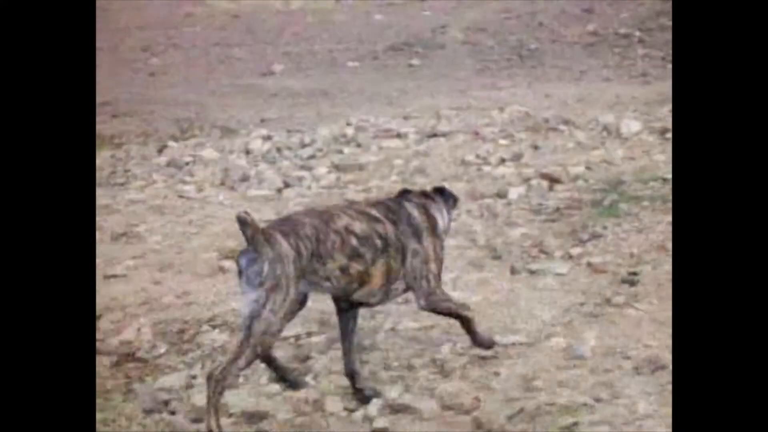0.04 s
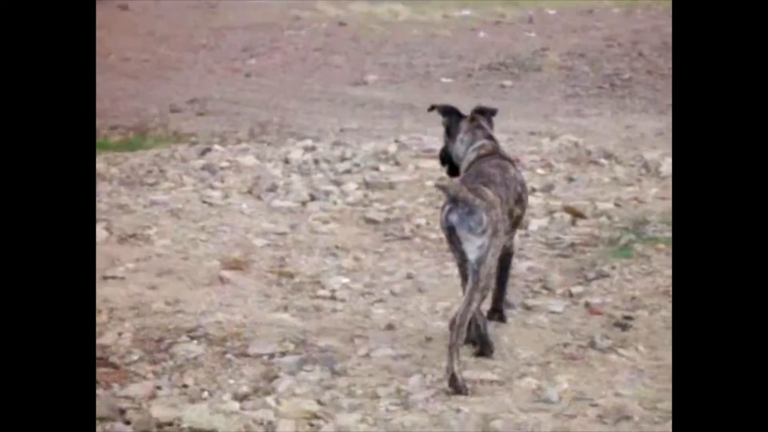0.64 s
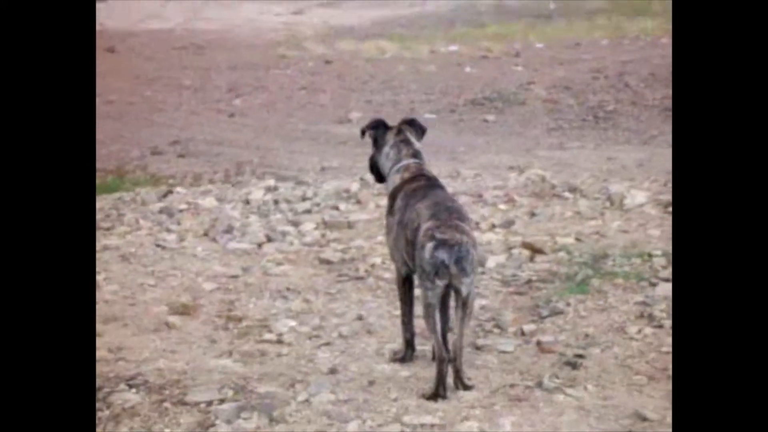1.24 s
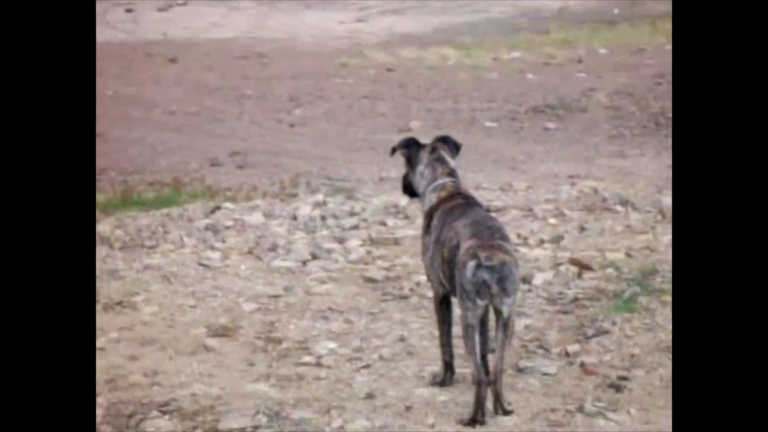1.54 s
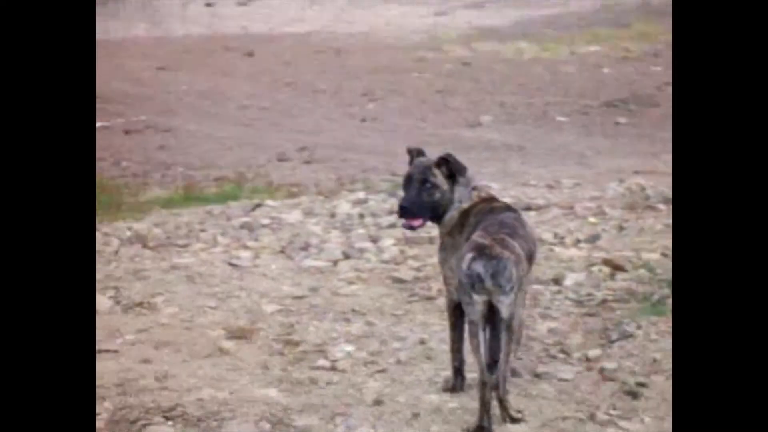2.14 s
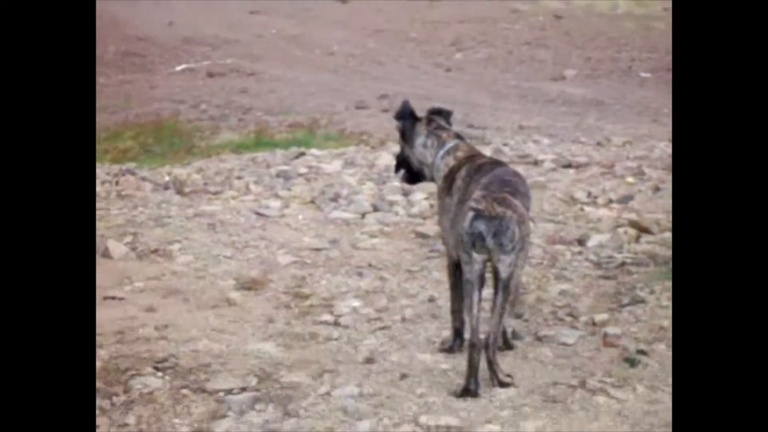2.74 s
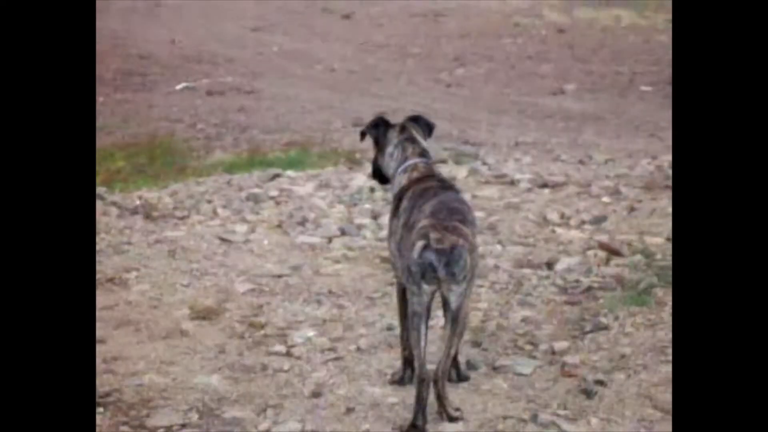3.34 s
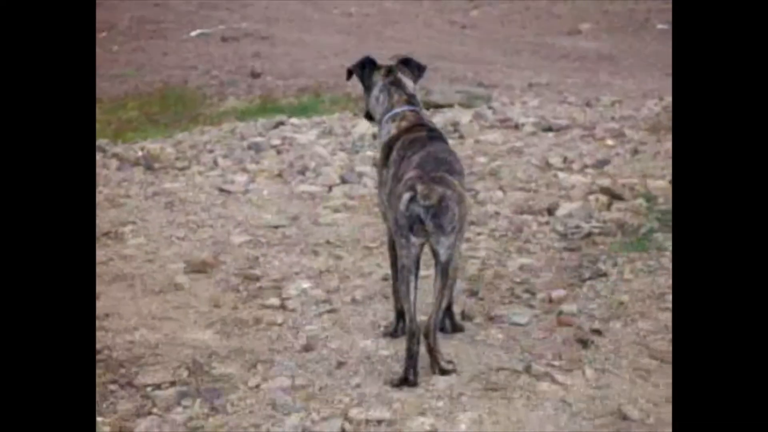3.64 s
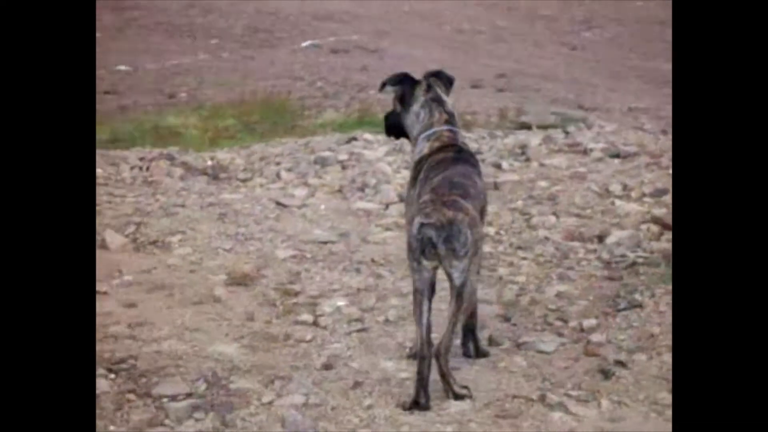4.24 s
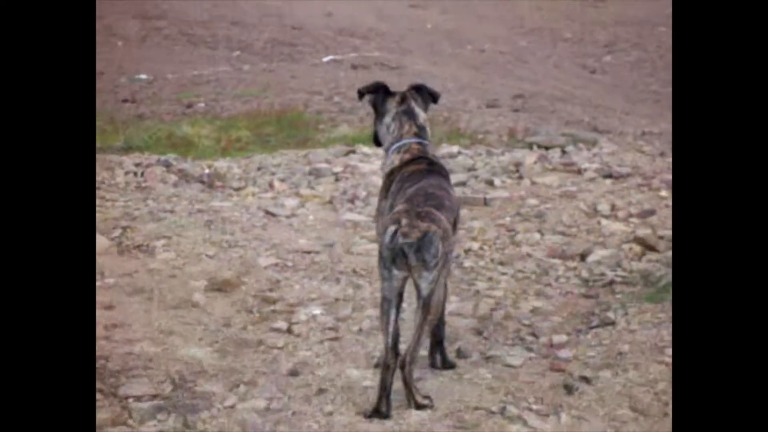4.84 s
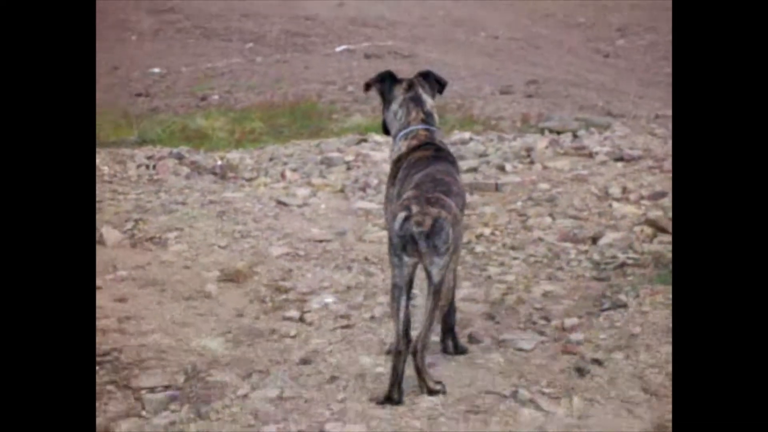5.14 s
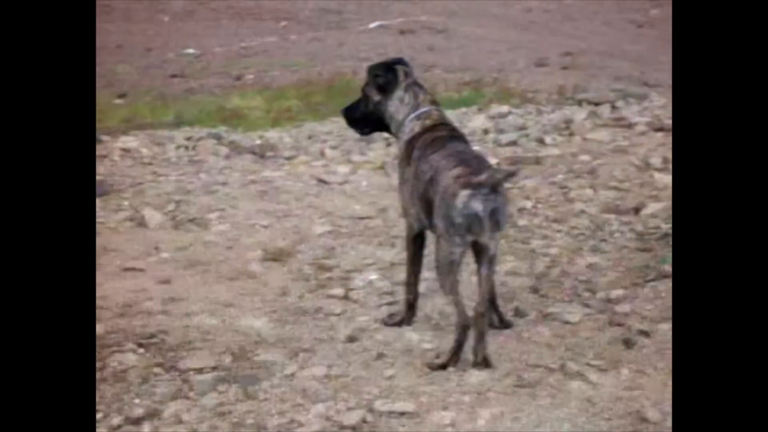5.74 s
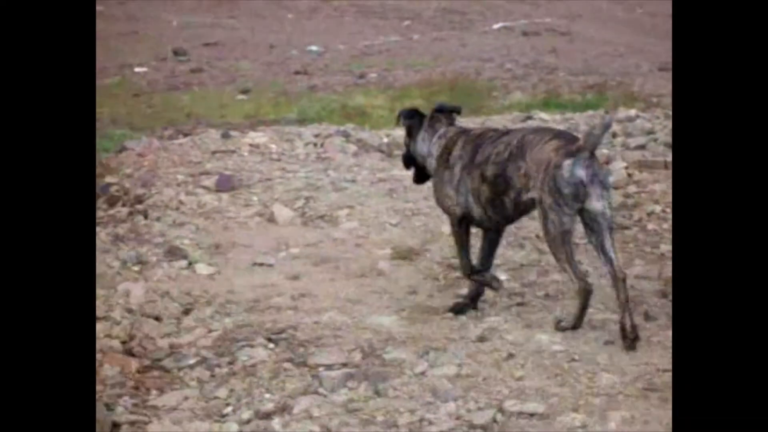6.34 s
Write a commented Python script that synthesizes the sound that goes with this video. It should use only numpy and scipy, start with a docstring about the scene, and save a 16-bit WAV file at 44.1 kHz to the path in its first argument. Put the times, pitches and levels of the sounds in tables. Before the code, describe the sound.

Outdoors, a bird repeats a short, sharp double call, a nasal rasp followed by a falling slur, about twice a second. After two seconds a slightly lower bird joins with longer calls, and they overlap until shortly before the end. Stones click now and then under a dog's paws, and a small bird chips faintly. Hiss, rumble and a distant motor lie behind, on a small, narrow-band mono microphone.

```python
"""Two birds over stony ground

Out in the open, a higher and a lower bird call to each other: each call starts as a throbbing rasp,
breaks into a clear nasal note and slurs downward. Stones click now and then; a small bird chips farther
off. Behind them lie a distant motor, hiss and low rumble, all on a small camera's narrow-band mono mic."""
import sys
import numpy as np
from scipy import signal
from scipy.io import wavfile

SR = 44100
rng = np.random.default_rng(int(sys.argv[2]) if len(sys.argv) > 2 else 0)


def digitize_waveform(pressure):
    """Quantize a signal to 16-bit integers and store it at the path in sys.argv[1].

    Rows of a 2-D input are taken as channels; values are limited to [-1, 1].
    """
    field = np.atleast_2d(pressure).T
    bounded = np.clip(field, -1, 1)
    quanta = np.round(bounded * 32767).astype(np.int16)
    wavfile.write(sys.argv[1], SR, quanta)


N = 290178
TIME = np.arange(N) / SR


def high_bird():
    """The higher bird: a rasping call, followed by a short slur that scoops in and slides down."""
    # calls: (start [s], break from rasp to clear [s], end [s], lead-in [s], rasp pitch [Hz],
    # top pitch [Hz], rasp level [dB], clear level [dB], roughness [0-1])
    high_calls = [(.376, .425, .47, 0.029, 1147, 1350, -21.5, -20, 0.15),
                  (.846, .903, .942, 0.021, 1173, 1357, -24, -20, 0.29),
                  (1.326, 1.405, 1.425, 0.02, 1201, 1248, -25, -23.5, 0.47),
                  (1.825, 1.885, 1.918, 0.016, 1184, 1383, -25, -25.5, 0.44),
                  (2.38, 2.424, 2.452, .01, 1193, 1377, -29, -24, .22),
                  (2.972, 3.013, 3.06, 0.021, 1202, 1352, -23, -23, 0.25),
                  (3.485, 3.548, 3.587, .022, 1227, 1373, -26, -21.5, .4),
                  (4.05, 4.106, 4.147, .01, 1137, 1358, -26.5, -22.5, 0.31),
                  (4.61, 4.662, 4.716, .029, 1225, 1360, -22, -23, .33),
                  (5.25, 5.308, 5.35, .011, 1184, 1354, -29, -24.5, 0.3)]
    # slurs: (start [s], end [s], top pitch [Hz], level [dB])
    high_slurs = [(0.035, 0.094, 1332, -20.5), (0.526, 0.581, 1345, -20), (1.005, 1.059, 1349, -19.5),
                  (1.49, 1.554, 1346, -23), (2.53, 2.586, 1326, -25), (3.109, 3.165, 1337, -23),
                  (3.656, 3.701, 1366, -25.5), (4.197, 4.25, 1350, -22), (4.768, 4.815, 1346, -23),
                  (5.397, 5.438, 1335, -23.5)]
    # harmonics 1-5: (rasping level [steps of 2 dB], clear level [steps of 2 dB])
    high_voice = [(-14, -15.5), (-8, -6.5), (-5, -5), (-5.5, -3.5), (-14, -29.5)]
    throat = dict(throb_hz=102.8, throb_depth=.21, leap=.145, jitter=.038, clear_chaos=.1,
                  resonance_hz=3860, resonance=.5, colour=-12, colour_per_s=2)
    call_shape = dict(lead_db=-7, catch_db=-2.5, sag=.032, sag_s=.016, drop=.078, drop_s=.008,
                      fade_db=-6, tail_db=-17, tail_s=.055)
    slur_shape = dict(lead_db=-9.5, catch_db=0, sag=.22, sag_s=.056, drop=.12, drop_s=.012,
                      fade_db=-11.5, tail_db=-9, tail_s=.065)
    scoop_s, scoop_hz, lead_s, rough = .0085, 1186, .018, .34
    slurs = [(start - scoop_s, start, end, lead_s, scoop_hz, hz, db - .5, db, rough)
             for start, end, hz, db in high_slurs]
    return sing(high_calls, call_shape, throat, high_voice) + sing(slurs, slur_shape, throat, high_voice)


def low_bird():
    """The lower bird answers with longer calls, coloured by a strong throat resonance."""
    # calls: (start [s], break from rasp to clear [s], end [s], lead-in [s], rasp pitch [Hz],
    # top pitch [Hz], rasp level [dB], clear level [dB], roughness [0-1], opening swoop [s])
    low_calls = [(1.905, 1.968, 2.072, .01, 1047, 1270, -22.5, -22.5, 0.5, 0),
                 (2.346, 2.425, 2.515, 0.0074, 1060, 1250, -21, -22.5, 0.31, 0.0014),
                 (2.766, 2.859, 2.945, 0.0062, 1065, 1240, -22, -22.5, 0.2, 0.0046),
                 (3.183, 3.256, 3.355, 0.013, 1071, 1237, -21.5, -23, 0.34, 0.0064),
                 (3.59, 3.68, 3.757, 0.0093, 1059, 1195, -23.5, -24.5, 0.61, 0.005),
                 (4.016, 4.066, 4.1, .011, 994, 1147, -22, -24, 0.38, .055),
                 (4.378, 4.435, 4.5, .019, 1021, 1210, -23, -23, 0.48, .028),
                 (4.795, 4.858, 4.955, 0.012, 1046, 1211, -23.5, -23.5, 0.38, 0),
                 (5.24, 5.32, 5.405, 0.012, 1023, 1195, -24, -27, 0.73, .03),
                 (5.724, 5.804, 5.88, 0.024, 1035, 1190, -22.5, -24.5, 0.35, 0.031)]
    # harmonics 1-5: (rasping level [steps of 2 dB], clear level [steps of 2 dB])
    low_voice = [(-14.5, -18), (-11, -9.5), (-6, -8), (-5, -3.5), (-10.5, -9)]
    throat = dict(throb_hz=106.3, throb_depth=.1, leap=.018, jitter=.032, clear_chaos=.046,
                  resonance_hz=2816, resonance=12, colour=4, colour_per_s=-1.34)
    shape = dict(lead_db=-8.5, catch_db=1.5, sag=.095, sag_s=.025, drop=.12, drop_s=.015,
                 fade_db=-3, tail_db=-9.5, tail_s=.06)
    return sing(low_calls, shape, throat, low_voice)


def sing(calls, shape, throat, voice):
    """All notes of one kind from one bird, each at its own time."""
    out = np.zeros(N)
    for row in calls:
        first, sound = bird_call(shape, throat, voice, *row)
        out[first:first + len(sound)] += sound
    return out


def bird_call(shape, throat, voice, start, crack, end, lead_s, rasp_hz, top_hz, rasp_db, clear_db,
              rough, swoop_s=0):
    """Voice-box membranes throb chaotically, then ring clear at `crack`; gives (first sample, sound)."""
    # harmonics 1-5 in an opening swoop: (added level [dB])
    swoop_voice = [-17.5, -1.5, -12, -5.5, -6]
    first = max(0, int((start - lead_s) * SR))
    t = TIME[first:int((end + shape["tail_s"]) * SR)]
    size = len(t)
    rasp = np.clip((crack - t) / .0056, 0, 1)
    bite = np.clip((crack - start) / .042, 0, 1) ** 2   # a very short rasp is only a soft scoop
    swoop = np.clip((start + swoop_s - t) / .0047, 0, 1) * (swoop_s > 0)
    tail = np.clip((t - end) / .0048, 0, 1)

    # on every throb the membranes flip briefly to a higher register
    beats = np.cumsum(throat["throb_hz"] * (1 + .075 * drift(40, size))) / SR
    throb = np.cos(2 * np.pi * (beats - np.interp(start, t, beats)))
    flip = ((1 + throb) / 2) ** 3
    wobble = throat["leap"] * (flip - .15) + throat["jitter"] * rough * drift(690, size)
    pitch = note_pitch(t, start, crack, end, rasp_hz, top_hz, shape)
    pitch *= 1 + swoop * np.interp(t, [t[0], start + .02045], [.04, .17])
    pitch *= 1 + rasp * bite * wobble + .0042 * drift(120, size) + .0041 * drift(25, size)
    phase = 2 * np.pi * np.cumsum(pitch) / SR
    stutter = rasp * bite * np.where(t < start, .65, throat["throb_depth"] + .18 * swoop)
    pulsing = (1 + stutter * throb) / np.sqrt(1 + stutter ** 2 / 2)

    # chaotic vibration spreads every harmonic into a band, and briefly outlasts the break
    lingering = .29 * (1 - rasp) * np.exp(-np.maximum(t - crack, 0) / .016)
    chaos = throat["clear_chaos"] + rough * (rasp * (1 + flip) / 2 + lingering)
    # as the exchange goes on, even harmonics shift against odd ones and the 2nd gains a lift
    colour = throat["colour"] + throat["colour_per_s"] * start
    leans = [-.16, .096, -.074, .22, -.25]
    second_lift = -2.5 + .83 * start
    tone, power = 0, 0
    for k, ((rasping, clear), swoop_db, lean) in enumerate(zip(voice, swoop_voice, leans), 1):
        steps = rasp * rasping + (1 - rasp) * (clear + lean * colour)
        steps += throat["resonance"] / (1 + ((k * pitch - throat["resonance_hz"]) / 200) ** 2)
        steps += (k == 2) * second_lift
        steps -= k * tail   # the voice dulls in the tail
        gain = from_db((2 - swoop) * steps + swoop * swoop_db)   # a step is 2 dB, or 1 dB in a swoop
        in_phase = (1 + chaos * drift(310, size)) * np.sin(k * phase)
        quadrature = chaos * drift(580, size) * np.cos(k * phase)
        tone += gain * (in_phase + quadrature)
        power += gain ** 2 * (1 / 2 + chaos ** 2)
    hoarse = rasp * rough * rms_one(butter(rng.standard_normal(size), [2050, 5400], "band", order=4))
    envelope = note_gain(t, start, crack, end, rasp_db, clear_db, bite, shape)
    return first, envelope * pulsing * (tone / np.sqrt(power) + hoarse)


def note_pitch(t, start, crack, end, rasp_hz, top_hz, shape):
    """The pitch holds in the rasp, jumps at the break, sags, then drops as the air runs out."""
    rasping = rasp_hz * np.interp(t, [t[0], start + .0038], [.88, 1])
    held = np.clip(t, crack, end)
    sag = shape["sag"] * (1 - np.exp((crack - held) / shape["sag_s"]))
    drop = shape["drop"] * np.exp((held - end) / shape["drop_s"])
    tail_fall = .17 * np.clip((t - end) / shape["tail_s"], 0, 1)
    clear = top_hz * (1 - sag - drop) * (1 - tail_fall)
    return rasping + (clear - rasping) * np.clip(1 + (t - crack) / .004, 0, 1)


def note_gain(t, start, crack, end, rasp_db, clear_db, bite, shape):
    """A weak lead-in catches or swells, the rasp grows, the clear note fades into a faint tail."""
    soft_db = -2 * (1 - bite)   # a scoop starts more softly than a rasp
    lead_db, tail_db = rasp_db + shape["lead_db"], shape["tail_db"]
    db = np.interp(t, [t[0], start - .002, start + .003, (start + crack) / 2, crack + .0027],
                   [lead_db + soft_db, lead_db + shape["catch_db"], rasp_db - 2 + soft_db,
                    rasp_db, clear_db])
    db += shape["fade_db"] * np.clip((t - crack) / (end - crack), 0, 1) ** 2
    db += np.interp(t, [end - .002, end + .0075, end + shape["tail_s"]], [0, tail_db, tail_db - 11])
    edge_fade = np.clip(np.minimum(t - t[0], t[-1] - t) / .0024, 0, 1)
    return from_db(db) * edge_fade


def stone_clicks():
    """Stones knock together and ring in quickly dying modes, a little differently tuned each time."""
    # knocks: (time [s], level [dB], treble tilt [dB/octave])
    stone_knocks = [(.133, -19.5, -7), (0.447, -24.5, -9.5), (0.6869, -17, -0.5), (1.196, -31.5, -19),
                    (2.503, -23.5, -3), (4.153, -29.5, -1), (4.996, -26, -4)]
    # ring of a stone: (frequency [Hz], level [dB], time to fall 60 dB [s])
    stone_modes = [(700, -17.5, 0.021), (1063, -11, 0.018), (1520, -5.5, 0.025), (2000, -2, 0.015),
                   (2600, 2.5, 0.0073), (2760, 4.5, 0.016)]
    out, t = np.zeros(N), TIME[:SR // 25]
    for start, knock_db, tilt in stone_knocks:
        at = int(start * SR)
        for k, (hz, mode_db, t60) in enumerate(stone_modes):
            gain = from_db(knock_db + mode_db + tilt * np.log2(hz / 1500) - 60 * t / t60)
            detuned_hz = hz * (1 + rng.normal(0, .045))
            out[at:at + len(t)] += (-1) ** k * gain * np.sin(2 * np.pi * detuned_hz * t)
    return butter(out, 4900, "low", order=3)


def small_bird():
    """Farther off, a small bird gives thin, slightly rough downward whistles."""
    # chips: (time [s], start pitch [Hz], end pitch [Hz], length [s], level [dB])
    bird_chips = [(1.796, 5870, 4850, 0.038, -30.5), (5.591, 5880, 5100, 0.045, -31.5),
                  (6, 5720, 4810, .025, -45)]
    out = np.zeros(N)
    for start, from_hz, to_hz, length, db in bird_chips:
        along = np.clip((TIME - start) / length, 0, 1)
        pitch = (from_hz + (to_hz - from_hz) * along) * (1 + .02 * drift(400, N))
        out += from_db(db) * np.sin(np.pi * along) * np.sin(2 * np.pi * np.cumsum(pitch) / SR)
    return out


def distant_motor():
    """A motor far from the mic: a noisy drone, and a wavering whine that swells and recedes."""
    # drone spectrum: (frequency [Hz], relative density [dB])
    motor_spectrum = [(220, -42.5), (380, -7), (397, -17), (538, -2.5), (1010, -11.5), (1100, -19),
                      (1430, -42.5), (2420, -120)]
    # drone loudness: (time [s], level [dB])
    motor_levels = [(0.0, -47), (0.42, -48.5), (2.2, -45.5), (2.69, -41.5), (5.15, -40.5), (5.24, -43.5),
                    (6.58, -41.5)]
    drone = level_curve(motor_levels, boost_db=1) * coloured_noise(motor_spectrum, flicker_db=2.43)
    whine_hz, whine_db, peak_s, swell_s = 527.5, -43, 4.5, .48
    swell = from_db(whine_db) / (1 + ((TIME - peak_s) / swell_s) ** 2) + from_db(whine_db - 19.5)
    pitch = whine_hz * (1 + .007 * drift(11, N))
    return drone + swell * np.sin(2 * np.pi * np.cumsum(pitch) / SR)


def open_air():
    """The ambience of the place: low rumble, hiss with one gust, and steady treble air above it."""
    # spectra of the three layers: (frequency [Hz], relative density [dB])
    rumble_spectrum = [(13, -39), (22, -13.5), (70, 1), (166, -2), (198, 1.5), (320, -7), (363, -7.5),
                       (397, -10), (450, -10.5), (580, -40), (990, -120)]
    hiss_spectrum = [(800, -8.5), (1150, -1), (1700, -5), (2300, -5.5), (3000, -6), (4000, -16)]
    air_spectrum = [(2000, -7), (2800, -3), (3800, -7.5), (5000, 4), (6300, -13.5)]
    # hiss loudness: (time [s], level [dB])
    hiss_levels = [(0.0, -47), (2.31, -45.5), (3.5, -43), (5.3, -50.5), (5.44, -48), (6.58, -56)]
    gust_at, rise_s, fall_s = 5.23, .13, .012
    gust = from_db(-30) * np.exp(np.minimum((TIME - gust_at) / rise_s, (gust_at - TIME) / fall_s))
    hiss_gain = level_curve(hiss_levels, boost_db=3.5) + gust
    rumble = from_db(-37.5) * coloured_noise(rumble_spectrum, flicker_db=1.5)
    hiss = hiss_gain * coloured_noise(hiss_spectrum, flicker_db=3.37)
    air = from_db(-51) * coloured_noise(air_spectrum, flicker_db=1.8)
    return rumble + hiss + air


def terrain(x, scatter_db, t60):
    """Sound reaches the mic directly, then as a few weak echoes and a thin wash off the terrain."""
    # echoes from the ground and the banks around: (delay [s], level [dB])
    ground_echoes = [(.0043, -32), (.024, -26.5), (0.04, -17), (0.061, -35.5)]
    t = TIME[:SR // 2]
    response = rng.standard_normal(len(t)) * from_db(-60 * t / t60) * (t > .008)
    response *= from_db(scatter_db) / np.linalg.norm(response)
    for delay, db in ground_echoes:
        response[int(delay * SR)] += from_db(db)
    return x + signal.fftconvolve(x, response)[:N]


def coloured_noise(spectrum, flicker_db):
    """Third-octave bands of noise that follow a spectrum, each flickering a little; rms 1."""
    hz, db = np.transpose(spectrum)
    edges = 20 * 2 ** (np.arange(27) / 3)
    white, out = rng.standard_normal((2, N)), np.zeros(N)
    for k, (low, high) in enumerate(zip(edges, edges[1:])):
        if high > hz[0] and low < hz[-1]:
            band_db = np.interp(np.log(low * high) / 2, np.log(hz), db)
            band = butter(white[k % 2], [low, high], "band")
            out += from_db(band_db + flicker_db * drift(10.5, N)) * band
    return rms_one(out)


def drift(rate_hz, size):
    """Smooth random wandering with spread 1."""
    pole = np.exp(-16 * np.pi * rate_hz / SR)
    white = rng.standard_normal(size // 8 + 3002)
    slow = signal.lfilter([1], [1, -2 * pole, pole * pole], white)[3000:]
    return np.interp(np.arange(size) / 8, np.arange(len(slow)), rms_one(slow))


def level_curve(rows, boost_db):
    """Gain at every sample from (time [s], level [dB]) rows, raised by boost_db."""
    return from_db(boost_db + np.interp(TIME, *np.transpose(rows)))


def from_db(db):
    """Decibels to gain."""
    return 10 ** (np.asarray(db) / 20)


def rms_one(x):
    """Scale to rms 1."""
    return x / np.sqrt(np.mean(x ** 2) + 1e-20)


def butter(x, hz, kind, order=2):
    """Butterworth filter."""
    return signal.sosfilt(signal.butter(order, hz, kind, fs=SR, output="sos"), x)


def scene():
    """Birds and stones in the open over a distant background, the same in both channels."""
    birds = from_db(.28) * high_bird() + from_db(.8) * low_bird() + small_bird()
    stones = from_db(2) * stone_clicks()
    mono = terrain(birds + stones, scatter_db=-18, t60=.4) + distant_motor() + open_air()
    return np.array([mono, mono])


def record(dry):
    """The camera samples its mic slowly behind soft filters: top partials gain a faint mirror image."""
    camera_rate_hz, cutoff_hz = 12000, 7843
    mirror = from_db(-3) * 2 * np.cos(2 * np.pi * camera_rate_hz * TIME)
    sampled = butter(dry, 7500, "low", order=8) * (1 + mirror)
    smooth = butter(sampled, 5820, "low", order=10)
    return signal.sosfilt(signal.cheby2(12, 45, cutoff_hz, fs=SR, output="sos"), smooth)


dry = scene()
out = record(dry)
digitize_waveform(out)
```